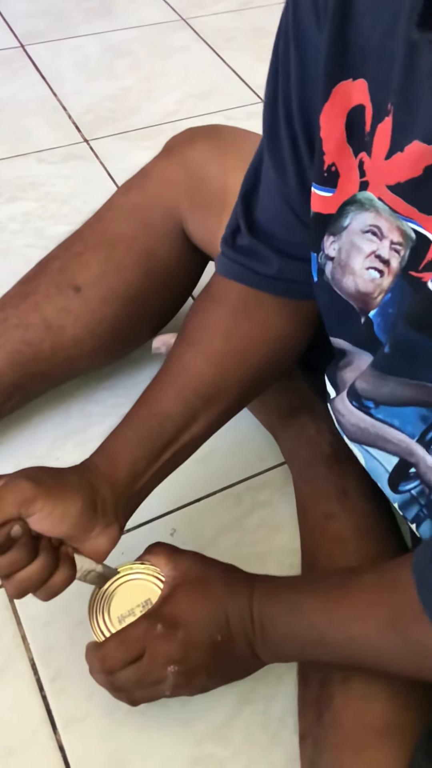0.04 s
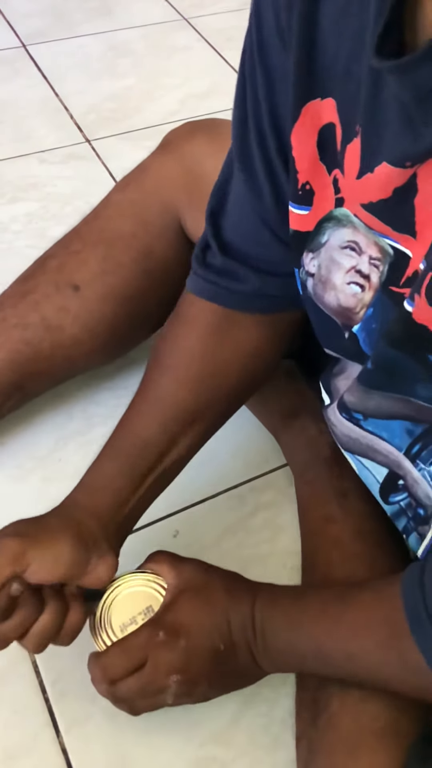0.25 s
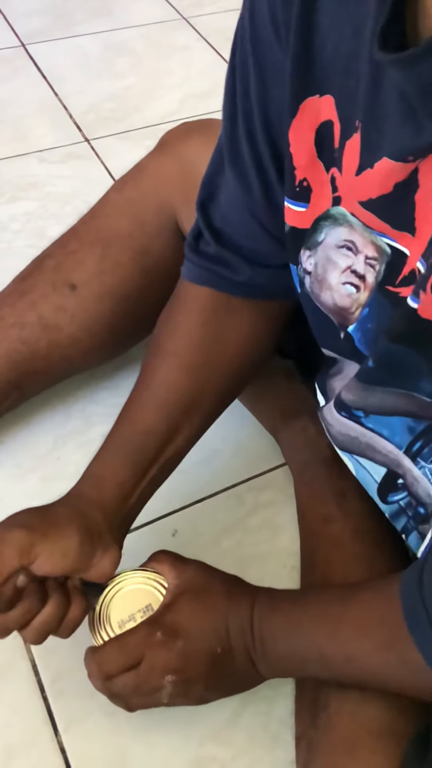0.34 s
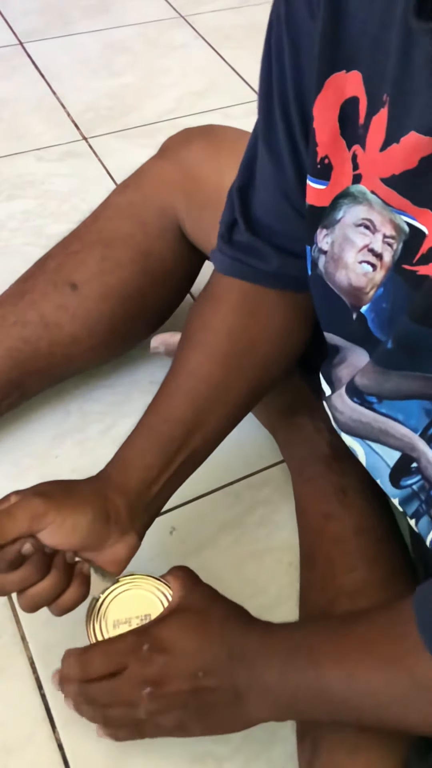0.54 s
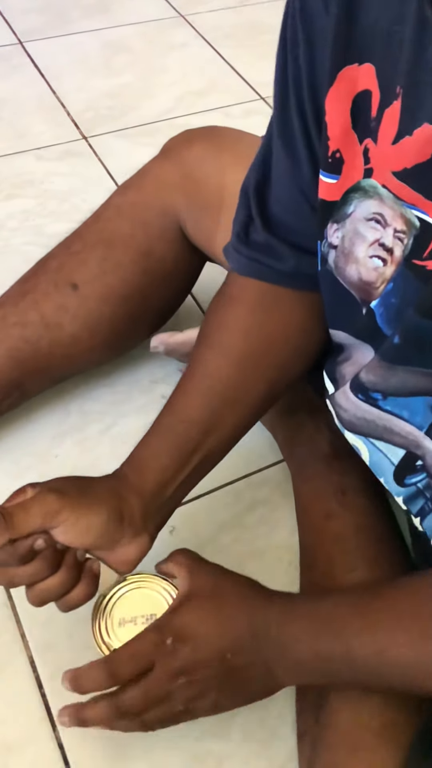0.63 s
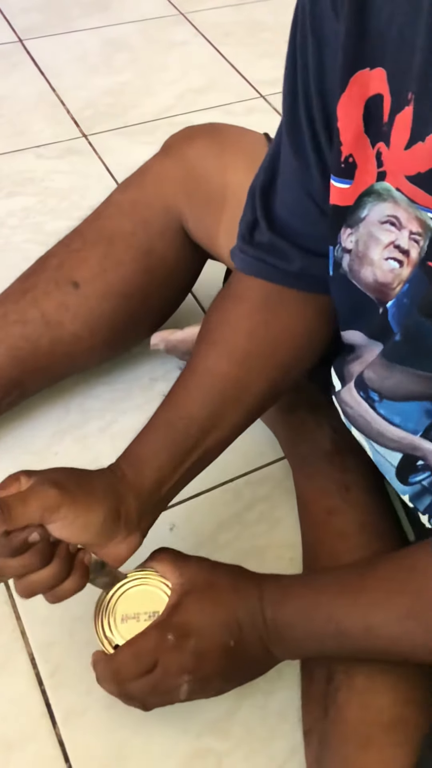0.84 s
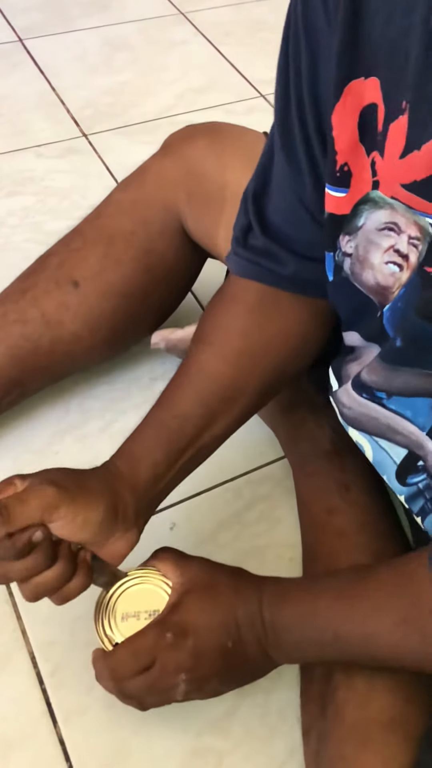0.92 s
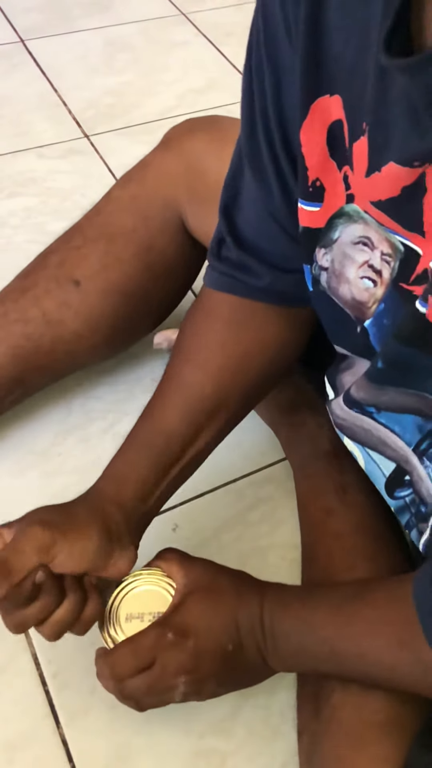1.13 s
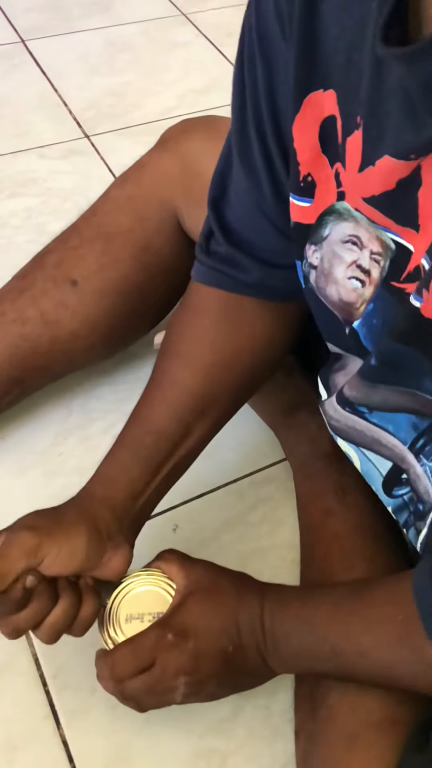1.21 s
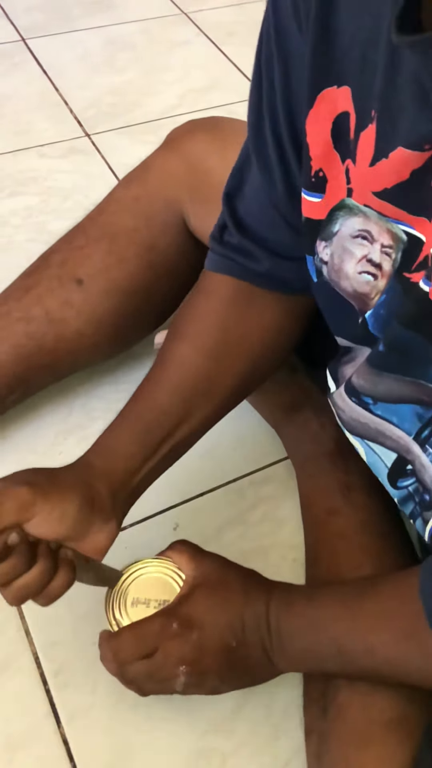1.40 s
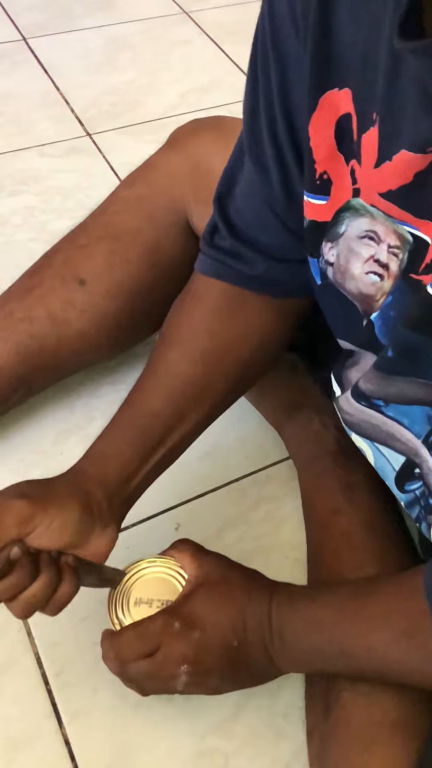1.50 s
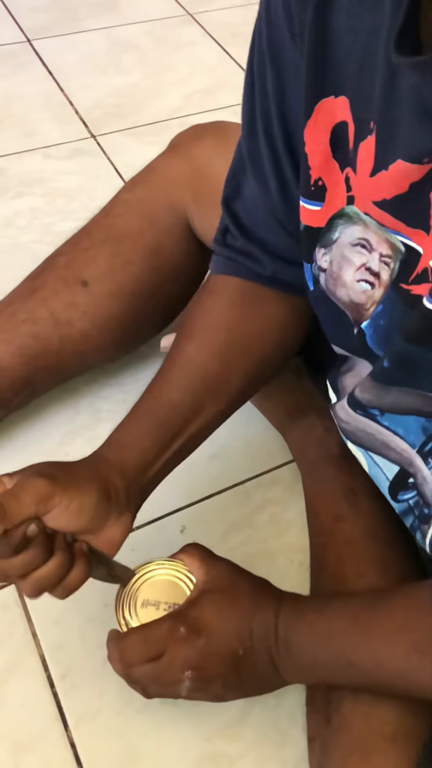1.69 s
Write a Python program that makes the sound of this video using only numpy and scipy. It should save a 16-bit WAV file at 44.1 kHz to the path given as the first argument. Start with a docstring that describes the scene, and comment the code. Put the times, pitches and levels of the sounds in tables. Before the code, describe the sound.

A knife punches and tears through a small tin's lid with sharp snaps and light scrapes.

```python
"""A knife levers through the lid of a small tin held on a tiled floor.
Twice the lid snaps under the point, then tears in a short rasp that sets the tin wall ringing.
In between, the blade scrapes and slides in the slit and the tin shifts with a low rub.
At the end the edge flicks free and the steel rings. Sleeves rustle over a quiet room tone,
and the hard room answers the metal sounds."""
import sys
import numpy as np
from scipy import signal
from scipy.fft import rfft, irfft
from scipy.io import wavfile
from scipy.ndimage import uniform_filter1d

SR = 44100
rng = np.random.default_rng(int(sys.argv[2]) if len(sys.argv) > 2 else 0)


def persist_wave(psi):
    """Save psi, clipped to +-1, as 16-bit WAV."""
    counts = np.round(np.clip(psi, -1, 1) * 32767).astype(np.int16)
    wavfile.write(sys.argv[1], SR, np.atleast_2d(counts).T)


N = 77175
T = np.arange(N) / SR

# Lid hits: (time [s], relative ring level [dB], tuning [Hz], ring length [factor],
# side mode trim [dB], crack level [dB])
SNAP_HITS = [(0.2160, -5.5, 1664, 0.79, -2.5, -29.5), (0.2484, -4.5, 1615, 1.3, -1.5, -22.5),
             (0.2595, -8, 1670, 0.55, -26, -15.5), (0.859, -21.5, 1754, 1.5, -5, -46),
             (0.8687, -23, 1690, 0.84, -0.5, -56), (0.884, -28, 1630, 1.1, -3, -56),
             (1.1427, -25, 1636, 1.43, 9.5, -31), (1.1760, -7.5, 1684, 0.97, -3, -23),
             (1.1889, -22, 1566, 0.76, -7, -18), (1.1978, -11, 1668, 1.3, -25, -16.5),
             (1.4126, -28, 1970, 1.1, -19, -40), (1.4310, -13.5, 1888, 1.64, -11, -30),
             (1.455, -21.5, 1700, 0.75, 7.5, -24), (1.4795, -20.5, 1721, 1.85, 3, -26.5)]
# Bright crack on each hit: (frequency [Hz], relative level [dB])
CRACK_EQ = [(200, -2.5), (600, -21), (850, -4.5), (1400, -4), (3000, 0.5), (4000, -3), (8000, -2.5),
            (12000, -11), (16000, -12.5)]
SNAP_GAIN_DB, UNITY_TUNING_HZ = 6.5, 1626.4  # this tuning leaves the lid's modes untransposed
def snaps():
    """The lid gives under the point: a bright crack and a short metallic ring each time."""
    out, crack = np.zeros(N + SR), noise(CRACK_EQ)
    for start, ring_db, tuning, length, side_db, crack_db in SNAP_HITS:
        ring, i = lid_ring(tuning / UNITY_TUNING_HZ, length, side_db), int(start * SR)
        out[i:i + len(ring)] += from_db(ring_db + SNAP_GAIN_DB) * ring
        out[:N] += from_db(crack_db) * fade(start, t60=0.019) * crack
    return out[:N]


# The lid's voice: (base frequency [Hz], relative level [dB], base t60 [s])
LID_MODES = [(445, -25, 0.046), (595.5, -15.5, .022), (1299, -10, 0.021), (1613, 0.5, 0.021),
             (1843, -10, 0.025), (2146, -15, 0.02), (2510, -23, 0.033), (3082, -15.5, 0.023),
             (4420, -30, 0.032), (5520, -25.5, 0.02), (6440, -32, 0.02), (7900, -32, 0.011),
             (11170, -30, 0.013)]
SWELL_CYCLES = 4.8
def lid_ring(pitch, length=1, side_db=0):
    """One click on the lid: each mode swells over a few cycles and is damped by the hand."""
    out, t = 0, T[:SR // 10]
    main_db = max(db for _, db, _ in LID_MODES)
    for hz, db, t60 in LID_MODES:
        gain = from_db(db + side_db * (db < main_db))
        attack = 1 - np.exp(-t * hz / (SWELL_CYCLES * length))
        decay = np.exp(-np.log(1000) * t / (t60 * length))
        out += gain * attack * decay * np.sin(2 * np.pi * min(hz * pitch, SR / 2) * t)
    return out


def driven_lid(per_s, pitch=1, side_db=0):
    """A run of slips keeps the lid ringing; rms 1."""
    return hold_level(signal.fftconvolve(slips(per_s), lid_ring(pitch, side_db=side_db))[:N])


# Rips through the lid: (start [s], length [s], mid-tear lid level [dB], lid ramp [dB],
# mid-tear rasp level [dB], rasp ramp [dB], full squeal level [dB], squeal start [Hz], squeal end [Hz])
TEAR_STROKES = [(0.262, .027, -17, 4.5, -17.5, 9, -21, 8705, 5880),
                (1.189, 0.0304, -20.5, -13, -22, 6, -23, 6000, 5477)]
# Rasp of steel on tin: (frequency [Hz], relative level [dB])
RASP_EQ = [(40, -36), (130, -12), (280, -8), (520, -4.5), (800, -14.5), (1400, 7), (2100, 4.5),
           (3000, -1.5), (4000, -8), (6500, -4.5), (9500, -9), (16000, -23)]
TEAR_ATTACK_S, SLIPS_PER_S, SQUEAL_WIDTH_HZ, SQUEAL_SLOPE_DB = 0.0024, 2500, 1070, 20
def tears():
    """Dense slips shake the lid and rasp; a rough squeal grows and dives as the blade sinks in."""
    out, body = 0, driven_lid(SLIPS_PER_S)
    rasp = friction(SLIPS_PER_S * 2, RASP_EQ)
    rough = flutter(SQUEAL_WIDTH_HZ / 2, shape=(2, N))
    for start, length, lid_db, lid_ramp, rasp_db, rasp_ramp, squeal_db, from_hz, to_hz in TEAR_STROKES:
        depth = np.clip((T - start) / length, 0, 1)
        push = np.clip((T - start) / TEAR_ATTACK_S, 0, 1) * release(start + length, t60=0.037)
        phase = 2 * np.pi * np.cumsum(from_hz + (to_hz - from_hz) * depth) / SR
        squeal = hold_level(rough[0] * np.cos(phase) + rough[1] * np.sin(phase))  # gliding noise band
        out += push * from_db(lid_db + lid_ramp * (depth - .5)) * body
        out += push * from_db(rasp_db + rasp_ramp * (depth - .5)) * rasp
        out += push * from_db(squeal_db + SQUEAL_SLOPE_DB * np.minimum(depth - .7, 0)) * squeal
    return out


# Ring of the tin wall: (frequency [Hz], relative level in tear 1 [dB], in tear 2 [dB], t60 [s])
WALL_MODES = [(468, -28.5, -38, 0.049), (570, -28.5, -65, 0.069), (1303, -37, -38, 0.22),
              (1410, -19.5, -25, 0.083), (1564, -20, -36, 0.068), (1590, -38, -44, 0.16),
              (1866, -36, -41, 0.095), (2084, -37, -24.5, 0.11), (2580, -31, -44, 0.22),
              (3055, -26, -42, 0.13), (3260, -26, -38, 0.1), (3880, -35, -34, 0.096),
              (5740, -44, -33, 0.076), (5910, -29, -45, 0.27), (7800, -37, -43, 0.14)]
WALL_TRIM_DB = -2.5
def wall():
    """The wall's modes build during each tear and ring out; their mix depends on where the blade is."""
    out = 0
    for (start, length, *_), levels in zip(TEAR_STROKES, np.transpose(WALL_MODES)[1:3]):
        build = np.clip((T - start) / length, 0, 1)
        for (hz, _, _, t60), db in zip(WALL_MODES, levels):
            out += from_db(WALL_TRIM_DB + db) * build * release(start + length, t60) * sine(hz)
    return out


# The blade's voice: (frequency [Hz], relative level in flick 1 [dB], in flick 2 [dB], free t60 [s])
BLADE_MODES = [(1875, -40.5, -25, .13), (3066, -28, -19, 0.1), (3110, -34, -37, 0.52),
               (3540, -43, -42, 0.082), (4290, -24, -50, 0.16), (5400, -37, -30.5, 0.054)]
# Flicks off the rim: (time [s], ring gain [dB], share of free t60 [0-1], rasp level [dB], rasp t60 [s])
BLADE_FLICKS = [(1.4657, 2.5, 0.18, -31, 0.03), (1.4823, -0.5, 0.73, -22.5, 0.057)]
def blade():
    """The edge rasps off the rim and the steel rings: choked while it touches, longer once free."""
    out, rasp = 0, friction(SLIPS_PER_S, RASP_EQ)
    mixes = np.transpose(BLADE_MODES)[1:3]
    for (start, ring_db, share, rasp_db, rasp_t60), levels in zip(BLADE_FLICKS, mixes):
        out += from_db(rasp_db) * fade(start, rasp_t60) * rasp
        for (hz, _, _, t60), db in zip(BLADE_MODES, levels):
            out += from_db(ring_db + db) * fade(start, share * t60) * sine(hz)
    return out


# Fader ride of the scrape: (time [s], level [dB])
SCRAPE_RIDE = [(.81, -66), (.837, -39.5), (.857, -38.5), (.874, -30.5), (.89, -36), (.903, -38),
               (.915, -51), (.95, -61)]
# Soft grain of the scrape: (frequency [Hz], relative level [dB])
SCRAPE_EQ = [(100, -29), (900, -28.5), (1300, -4.5), (1950, 3.5), (2600, -21), (3400, -8), (4500, -21.5),
             (7000, -17.5), (16000, -39)]
SCRAPE_SLIPS_PER_S, SCRAPE_RASP_DB = 1500, -4
def scrape():
    """The point strokes the lid lightly: its main mode sings through a soft, grainy rasp."""
    body = driven_lid(SCRAPE_SLIPS_PER_S, pitch=1.051, side_db=-5.5)
    rasp = friction(SCRAPE_SLIPS_PER_S * 2, SCRAPE_EQ)
    return ride(SCRAPE_RIDE) * (body + from_db(SCRAPE_RASP_DB) * rasp)


# Blade moves in the slit: (peak time [s], rise [s], fall [s], level [dB])
SLIDE_MOVES = [(0.559, 0.029, 0.048, -40.5), (.48, 0.14, 0.067, -44.5), (0.679, 0.071, 0.1, -48.5),
               (1.345, 0.021, 0.034, -40.5), (1.383, 0.0083, 0.083, -37)]
# Broad sliding hiss: (frequency [Hz], relative level [dB])
SLIDE_EQ = [(40, -8), (150, 5), (350, 2.5), (650, -5.5), (1100, 0.5), (2000, -0.5), (5000, -1.5),
            (8000, -7.5), (12000, -12), (16000, -19)]
def slides():
    """The flat of the blade slides in the slit: a fine-grained hiss swells with each move."""
    return swells(SLIDE_MOVES) * colour(slips(per_s=9000), SLIDE_EQ)


# Fader ride of the rub: (time [s], level [dB])
RUB_RIDE = [(.35, -79), (.385, -39), (.425, -34.5), (.447, -32), (.48, -40), (.51, -35.5), (.55, -46.5),
            (.67, -54), (.78, -68)]
# Rumble under the judder: (frequency [Hz], relative level [dB])
RUMBLE_EQ = [(30, -16), (60, -11), (110, 6), (200, -3.5), (400, -33), (900, -15), (3000, -61)]
RUB_HZ, RUB_WANDER, RUMBLE_DB = 109, 0.043, -3.5
def rub():
    """The tin shifts on the tiles: a low, unsteady judder with a little rumble."""
    hz = RUB_HZ * (1 + RUB_WANDER * flutter(cutoff_hz=25))
    judder = rms_one(np.sin(2 * np.pi * np.cumsum(hz) / SR))
    return ride(RUB_RIDE) * (judder + from_db(RUMBLE_DB) * noise(RUMBLE_EQ))


# Cloth moves: (peak time [s], rise [s], fall [s], level [dB])
RUSTLE_MOVES = [(.34, 0.023, 0.12, -49.5), (.56, 0.081, .08, -46), (1.23, 0.013, 0.027, -39.5),
                (1.64, 0.059, 0.084, -52)]
# Muffled cloth tone: (frequency [Hz], relative level [dB])
RUSTLE_EQ = [(30, -20), (80, -3), (150, 2.5), (260, -8.5), (380, -1.5), (600, -13), (1500, -25),
             (5000, -51)]
def rustle():
    """Hands and sleeves shift in dull swells of noise."""
    return swells(RUSTLE_MOVES) * noise(RUSTLE_EQ)


def lingering_lid():
    """A faint ring of the lid dies away at the start."""
    return from_db(-49.5) * fade(0, t60=0.56) * driven_lid(SLIPS_PER_S)


# Tiled-room reverb: (frequency [Hz], t60 [s], level [dB])
REVERB_BANDS = [(200, 0.79, -18), (445, 0.38, -18), (820, 0.66, -7), (1560, 0.47, -22), (2630, 0.95, -16),
                (3700, 0.53, -12.5), (6900, 0.46, -16), (14000, 0.25, -13.5)]
EARLY_DB, PREDELAY_S, TAIL_BUILD_S = -21, 0.017, 0.0083
def reverb(x):
    """Early reflections off floor and body, then a diffuse tail that dies band by band."""
    hz, t60, db = np.transpose(REVERB_BANDS)
    edges, response = np.geomspace(100, 18000, 10), 0
    build = 1 - np.exp(-T / TAIL_BUILD_S)
    for low, high in zip(edges, edges[1:]):
        log_centre = np.log(low * high) / 2
        gain = from_db(np.interp(log_centre, np.log(hz), db))
        tail = build * fade(PREDELAY_S, np.interp(log_centre, np.log(hz), t60))
        bandpass = signal.butter(2, [low, high], "band", fs=SR, output="sos")
        band = signal.sosfilt(bandpass, rng.standard_normal(N))
        response += gain * band * tail / np.linalg.norm(tail)
    early = fade(0.00067, t60=0.26) * rng.standard_normal(N)
    response += from_db(EARLY_DB) * early / np.linalg.norm(early)
    return signal.fftconvolve(x, response)[:N]


# Background bed: (frequency [Hz], relative level [dB])
ROOM_TONE_EQ = [(25, -17), (45, -11), (68, 3.5), (115, 0), (160, -3.5), (300, -11.5), (600, -13),
                (1100, -12.5), (1700, -17.5), (3000, -20), (7000, -28.5), (12000, -36.5), (16000, -40)]
def room_tone():
    """A quiet, steady, bass-heavy bed of noise."""
    return from_db(-49) * noise(ROOM_TONE_EQ)


def slips(per_s, spread_db=4):
    """Stick-slip clicks at random moments and of uneven size."""
    clicks = rng.random(N) < per_s / SR
    return clicks * from_db(spread_db * rng.standard_normal(N)) * rng.choice([-1, 1], N)


def friction(per_s, spectrum):
    """A steady rasp of equalised slips."""
    return hold_level(colour(slips(per_s), spectrum))


def hold_level(x, window_s=0.0087):
    """Hold a driven vibration at rms 1, as a firm push keeps it steady."""
    power = np.abs(uniform_filter1d(x ** 2, int(window_s * SR)))
    return x / np.sqrt(power + 1e-9)


def sine(hz):
    """One mode with a random phase."""
    return np.sin(2 * np.pi * (hz * T + rng.random()))


def flutter(cutoff_hz, shape=N):
    """Low-passed noise for modulation; rms 1."""
    lowpass = signal.butter(2, cutoff_hz, fs=SR, output="sos")
    return rms_one(signal.sosfilt(lowpass, rng.standard_normal(shape)))


def noise(spectrum):
    """Coloured noise; rms 1."""
    return colour(rng.standard_normal(N), spectrum)


def colour(x, spectrum):
    """Apply an EQ curve of (frequency [Hz], relative level [dB]); rms 1."""
    hz, db = np.transpose(spectrum)
    bins_hz = np.maximum(np.fft.rfftfreq(N, 1 / SR), 1)
    gain = from_db(np.interp(np.log(bins_hz), np.log(hz), db))
    return rms_one(irfft(rfft(x) * gain, N))


def swells(moves):
    """Envelope of overlapping bell-shaped moves, summed in power."""
    power = 0
    for peak, rise, fall, db in moves:
        width = np.where(T < peak, rise, fall)
        power += (from_db(db) * np.exp(-.5 * ((T - peak) / width) ** 2)) ** 2
    return np.sqrt(power)


def ride(curve):
    """Fader that follows (time [s], level [dB]), silent outside the curve."""
    times, db = np.transpose(curve)
    return from_db(np.interp(T, times, db, left=-200, right=-200))


def fade(start, t60):
    """Silence, then a decay from height 1."""
    return (T >= start) * release(start, t60)


def release(start, t60):
    """Height 1 until start, then a fall of 60 dB every t60 seconds."""
    return np.exp(-np.log(1000) * np.maximum(T - start, 0) / t60)


def from_db(db):
    """Decibels to gain."""
    return 10 ** (np.asarray(db) / 20)


def rms_one(x):
    """Scale to unit rms."""
    return x / np.sqrt(np.mean(x ** 2) + 1e-20)


def scene():
    """Mono mix: knife and tin feed the reverb; handling and background stay dry."""
    metal = snaps() + tears() + wall() + scrape() + slides() + blade()
    linger = lingering_lid()
    handling = rub() + rustle()
    return (metal + reverb(metal) + handling + linger + room_tone())[None]


def record(dry):
    """Soft clipping rounds the peaks; a steep low-pass at 15.8 kHz cuts the top."""
    lowpass = signal.ellip(10, .1, 80, 15800, fs=SR, output="sos")
    return signal.sosfilt(lowpass, np.tanh(dry))


dry = scene()
out = record(dry)
persist_wave(out)
```